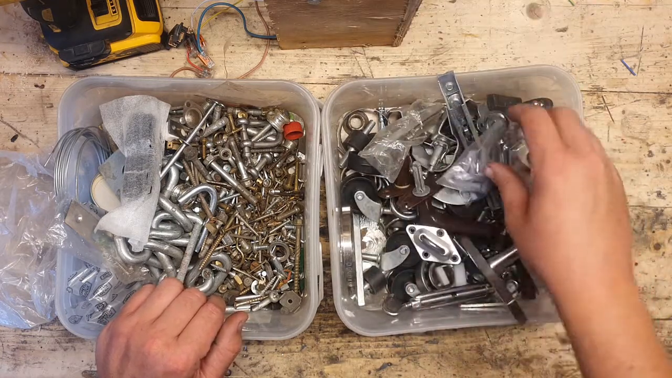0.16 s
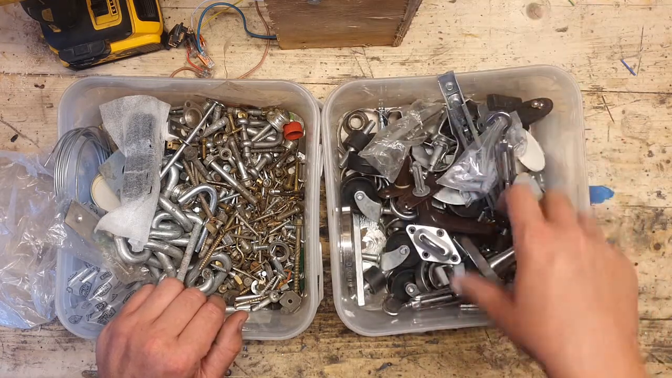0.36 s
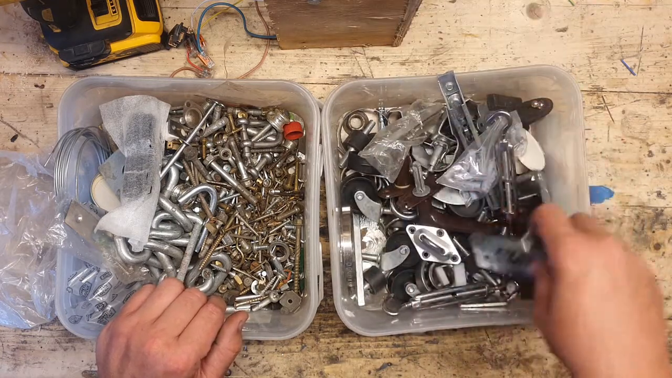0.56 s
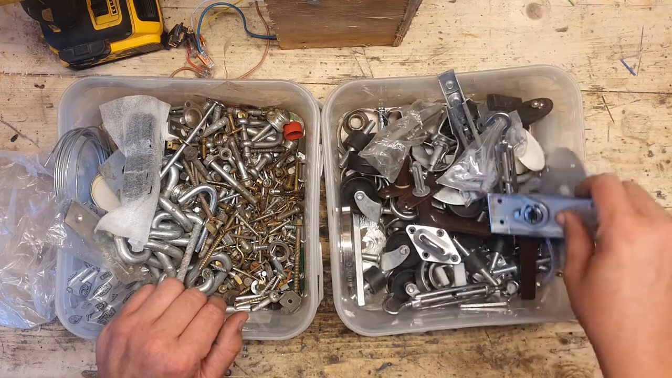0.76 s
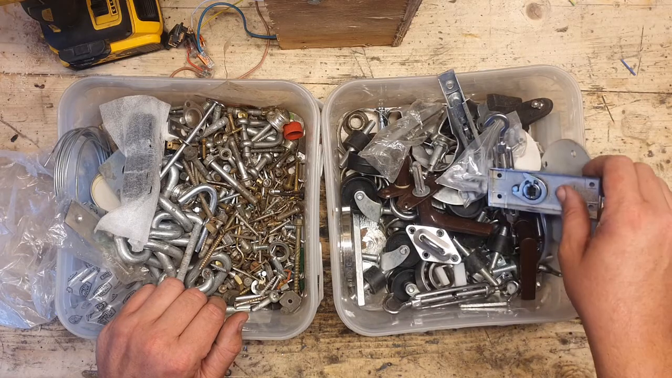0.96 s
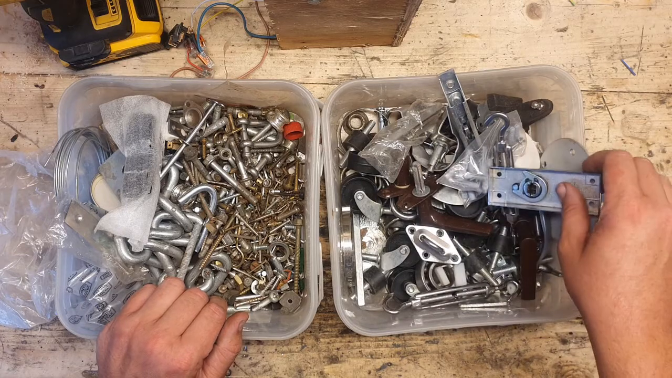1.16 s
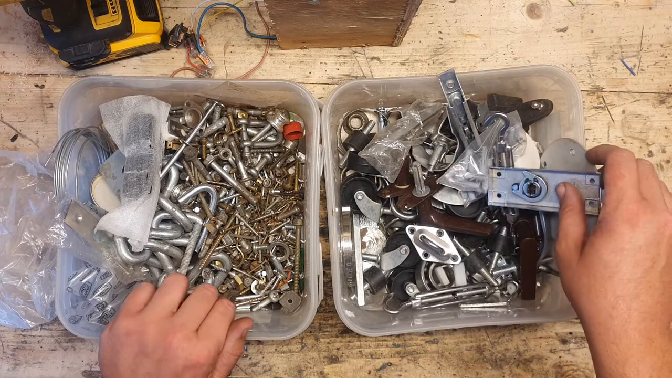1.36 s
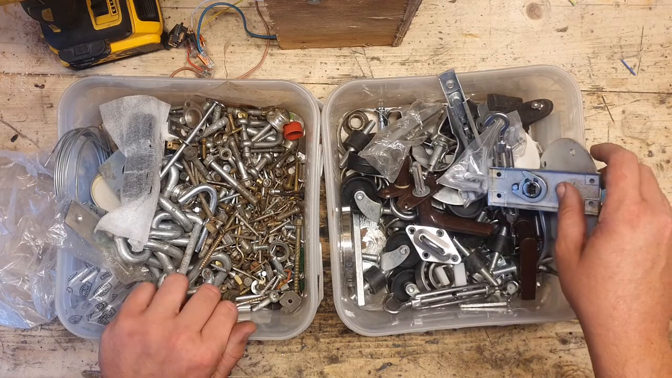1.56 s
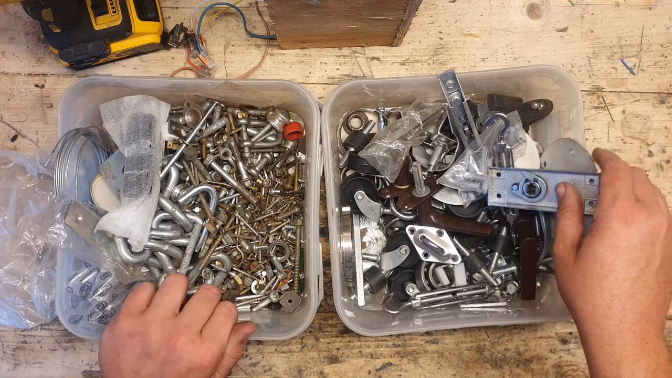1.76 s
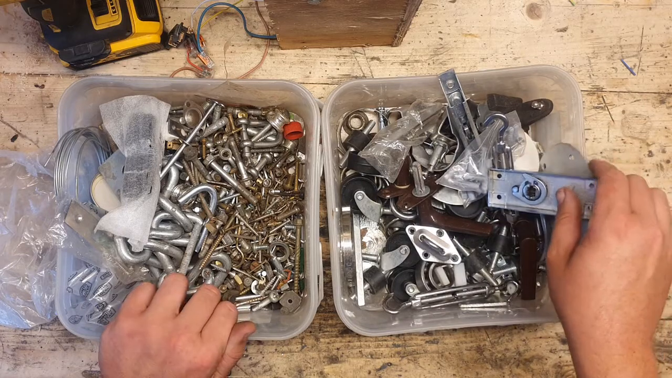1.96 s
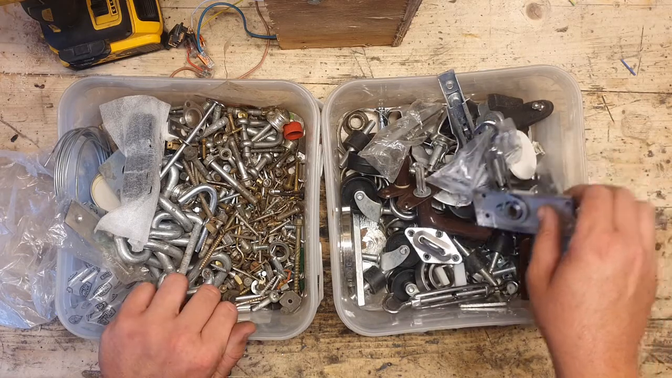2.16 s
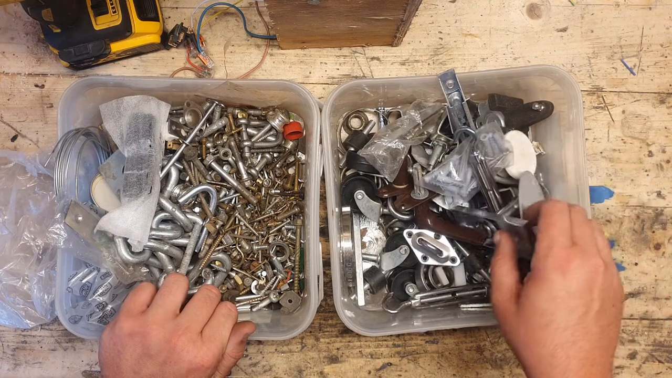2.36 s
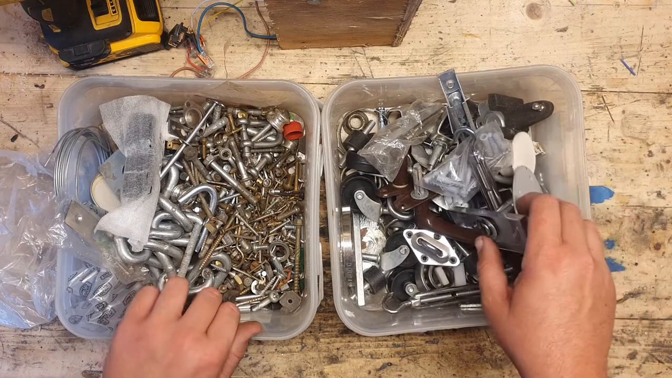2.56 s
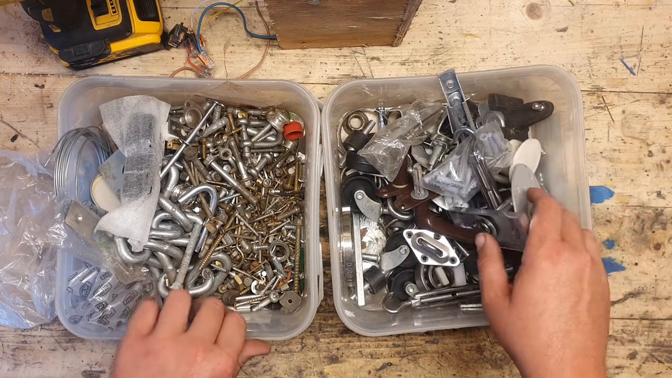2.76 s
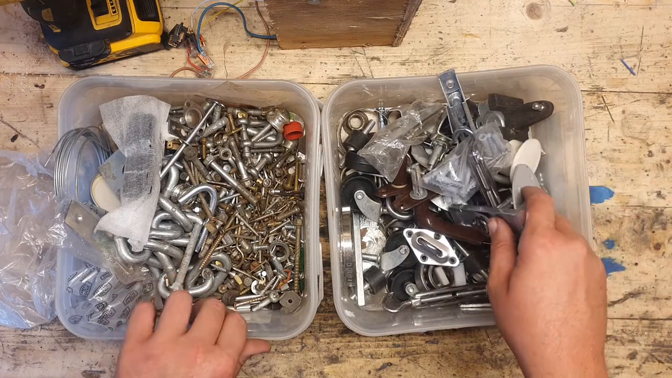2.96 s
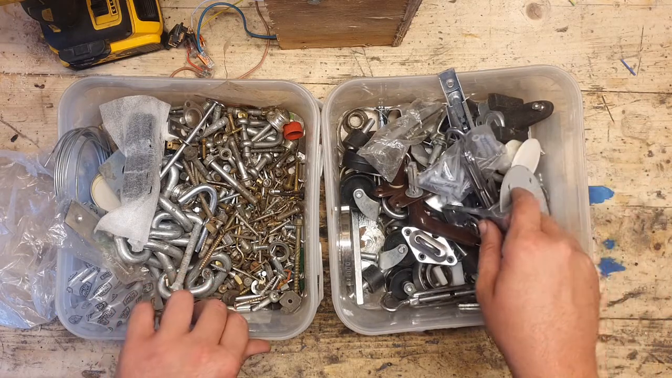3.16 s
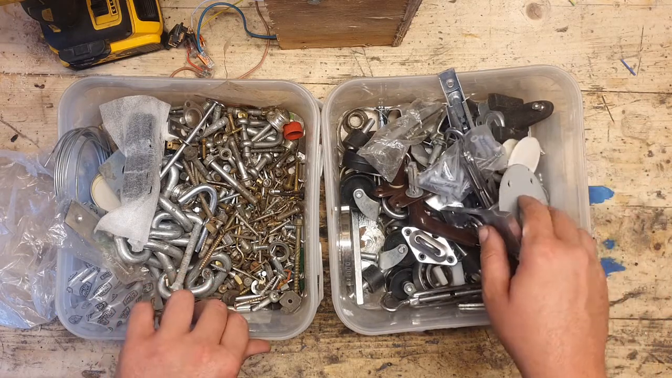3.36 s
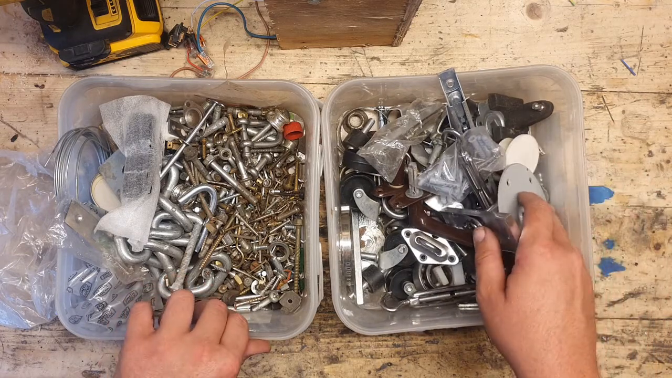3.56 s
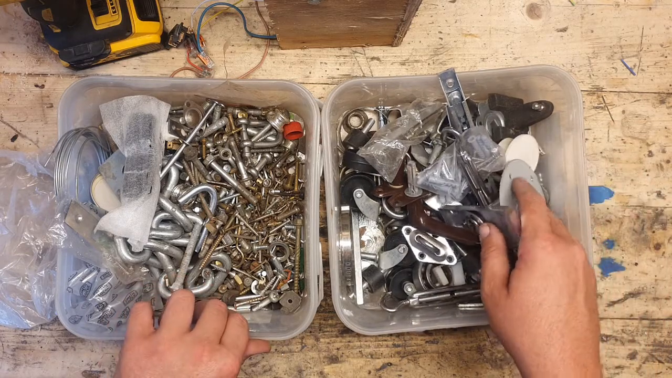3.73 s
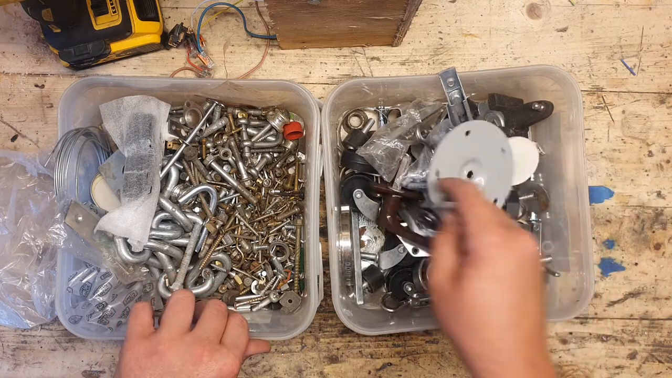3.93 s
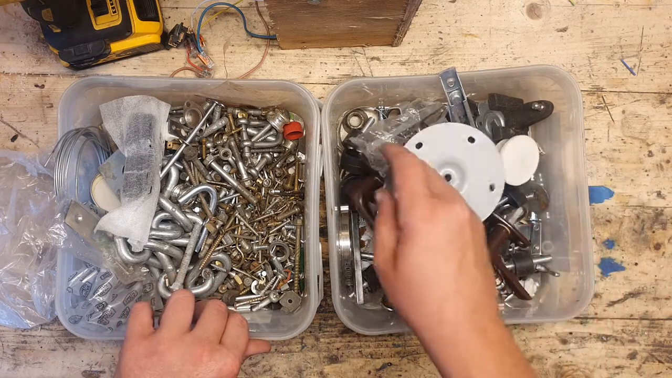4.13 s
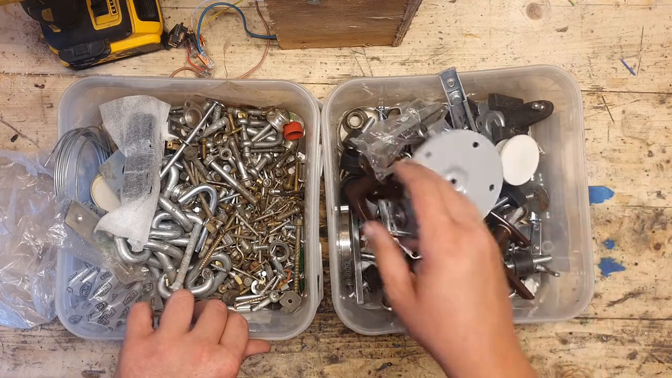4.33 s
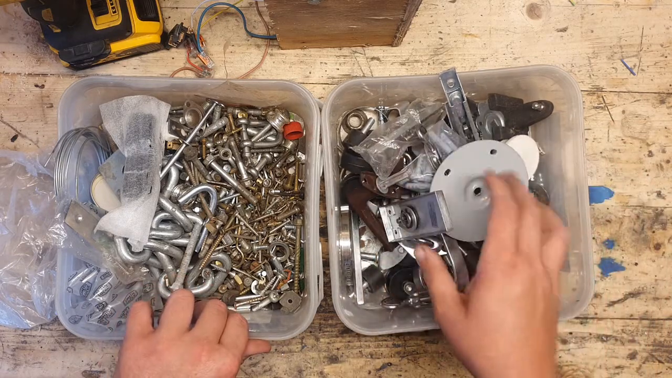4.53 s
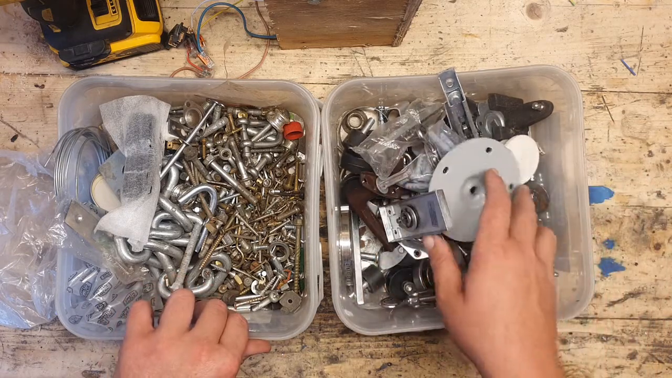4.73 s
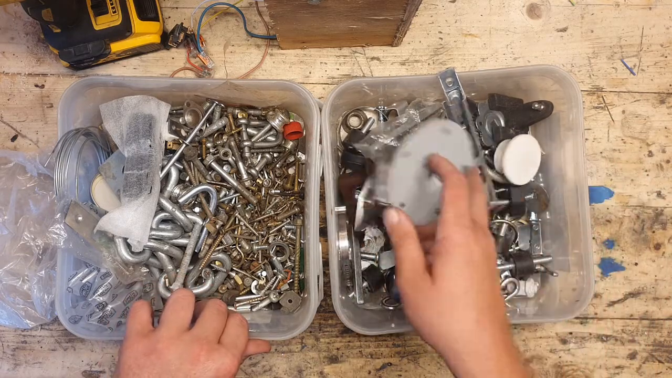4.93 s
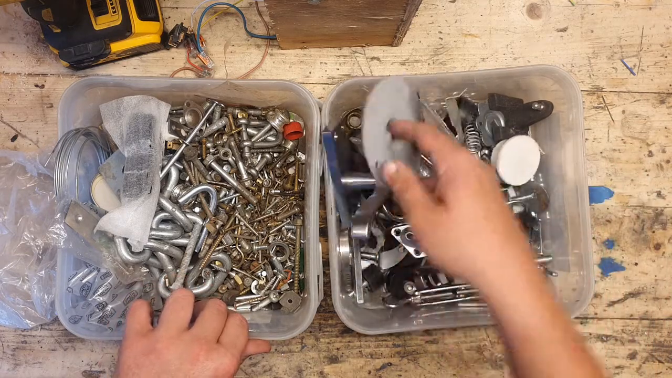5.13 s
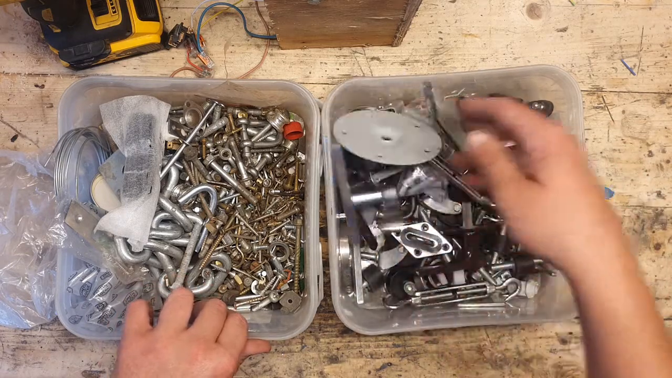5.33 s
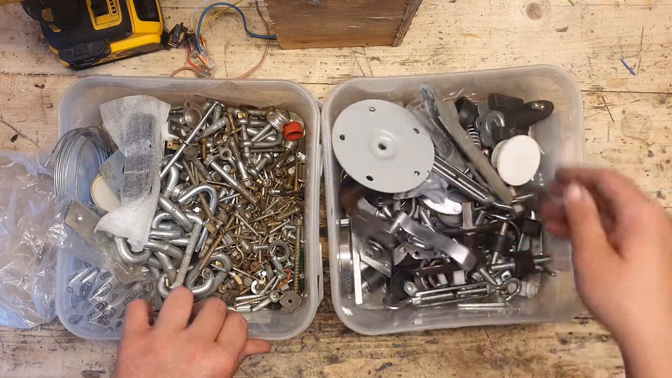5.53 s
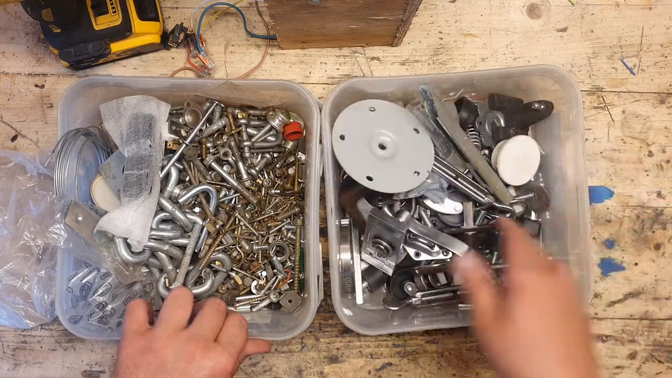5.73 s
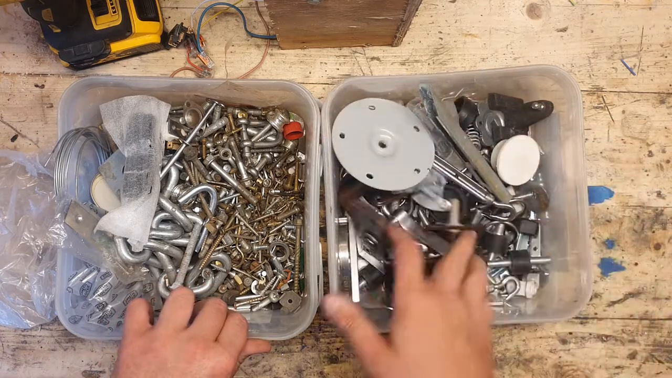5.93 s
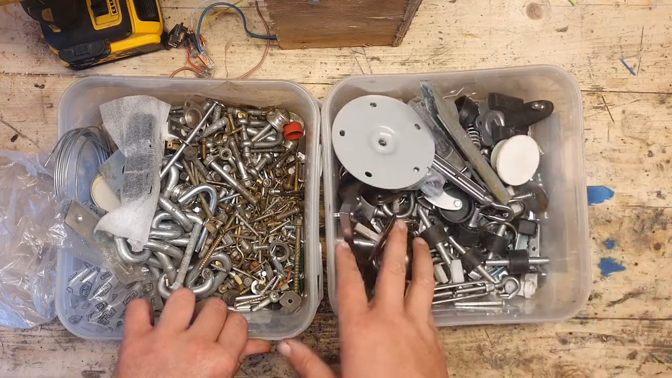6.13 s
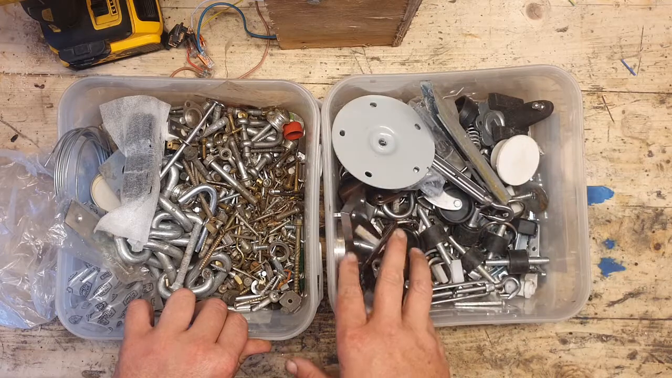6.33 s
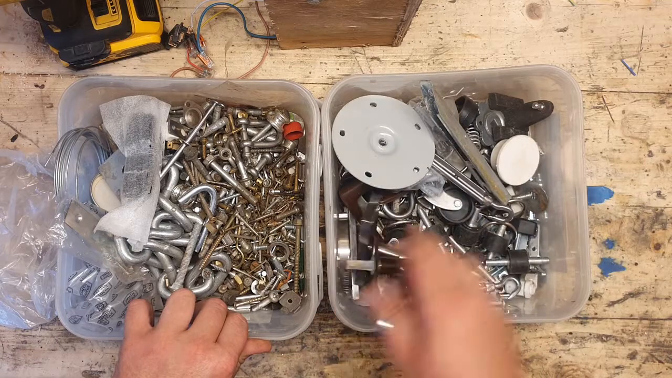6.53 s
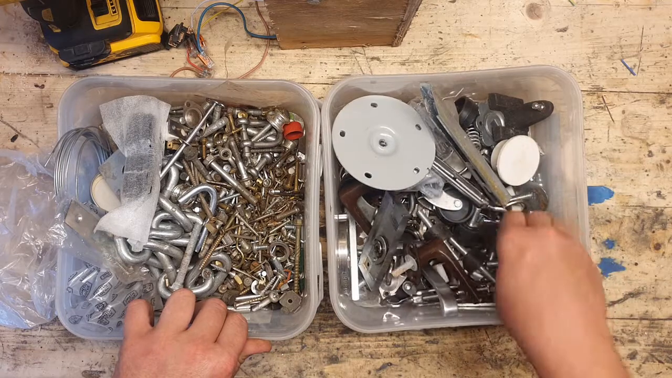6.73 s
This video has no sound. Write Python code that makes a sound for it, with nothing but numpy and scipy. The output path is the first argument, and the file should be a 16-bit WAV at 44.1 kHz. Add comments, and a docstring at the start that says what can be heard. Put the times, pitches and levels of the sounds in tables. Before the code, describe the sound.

A hand rummages in a plastic tub of loose metal fittings, clinking and rattling in bursts, with a ringing steel disc and hollow thuds.

```python
"""Rummaging in a tub of hardware

A hand rummages in a plastic tub of bolts, brackets and fittings on a workbench, just below the microphone.
Pieces knock and bounce as short clusters of modes and noise; pushes of the fingers set off random tiny contacts.
The tub thuds in its wall modes and groans under load; a steel disc and a small bracket ring until stopped.
The bench booms low, a small workshop adds short noise echoes, and a wavering rumble lies under faint hiss."""
import sys
import numpy as np
from scipy import signal
from scipy.fft import rfft, irfft
from scipy.io import wavfile
from scipy.ndimage import uniform_filter1d

SR = 44100
rng = np.random.default_rng(int(sys.argv[2]) if len(sys.argv) > 2 else 0)


def generate_wav(sig):
    """Save sig (samples, or channels by samples) to the path in sys.argv[1] as 16-bit PCM at SR."""
    pcm = np.round(np.clip(np.atleast_2d(sig).T, -1, 1) * 32767).astype(np.int16)
    wavfile.write(sys.argv[1], SR, pcm)


N = 299518
T = np.arange(N) / SR
SHORT = T[:SR // 6]

# blows on the steel disc: start_s, ring_db, treble tilt_db_per_octave, free_s until hand or heap stops it, clack_db
DISC_HITS = [(.023, -15, -2, 0.019, -9.5), (0.2008, -17.5, -2.5, 0.096, -11),
             (.571, -25.5, -8, 0.011, -17.5), (0.826, -42, -6, .09, -25), (3.924, -10, 1.5, 0.03, -17),
             (3.981, -22.5, 1.5, 0.03, -12.5), (4.241, -33, 1, 0.019, -24), (4.397, -20, 1.5, 0.03, -19),
             (4.435, -21, .5, 0.076, -26.5), (4.489, -16, -2.5, 0.21, -19.5),
             (4.742, -35, -3.5, 0.15, -21.5), (4.822, -20, 0.5, 0.039, -12.5),
             (4.983, -16.5, 3.5, 0.0056, -15), (5.242, -18.5, 3.5, 0.14, -20),
             (5.288, -17, -1.5, 0.055, -27.5)]
# blows on the bracket: start_s, ring_db, treble tilt_db_per_octave, free_s until it is stopped, clack_db
BRACKET_HITS = [(4.031, -25.5, -6, .12, -21.5), (5.543, -24, 3, 0.095, -7.5), (5.58, -21.5, 5, 0.022, -19),
                (6.257, -26, 0.5, 0.04, -20.5)]
# colour of the loose metal: frequency_hz, gain_db
METAL_COLOUR = [(300, -22.5), (700, 2.5), (950, -11), (1250, 2.5), (1900, 1.5), (2500, 4), (3300, 1),
                (5000, -2.5), (6500, -1), (8200, -8.5), (9300, -17), (11800, -7), (16000, -24.5)]


def undb(db):
    """Decibels to gain."""
    return 10 ** (np.asarray(db) / 20)


def fade(t, t60):
    """Free decay, 60 dB down after t60 seconds."""
    return np.exp(-np.log(1000) * t / t60)


def unit(x, count=220):
    """Scale a sound to rms 1 over its first samples."""
    return x / np.sqrt(np.mean(x[..., :count] ** 2))


def crest(x, size=130):
    """Scale a blow to rms 1 at its loudest moment."""
    power = uniform_filter1d(np.mean(x ** 2, axis=0), size)
    return x / np.sqrt(power.max())


def steady(x, size=4000):
    """Scale to a running rms of 1."""
    power = np.abs(uniform_filter1d(np.mean(x ** 2, axis=0), size))
    return x / np.sqrt(power + 1e-9)


def add(out, s, x):
    """Mix x into out from time s on."""
    i = max(int(s * SR), 0)
    out[..., i:i + x.shape[-1]] += x[..., :max(N - i, 0)]


def convolve(x, response):
    """Pass x through a response, keeping its length."""
    return signal.fftconvolve(np.atleast_2d(x), np.atleast_2d(response), axes=-1)[:, :x.shape[-1]]


def colour(x, points, size=2048):
    """Minimum-phase filter through (Hz, dB) points, joined on a log frequency axis."""
    hz, db = np.transpose(points)
    bins = np.maximum(np.fft.rfftfreq(size, 1 / SR), 1)
    gain = undb(np.interp(np.log(bins), np.log(hz), db))
    # folding the cepstrum forward makes the filter causal
    cepstrum = irfft(np.log(gain))
    cepstrum[1:size // 2] *= 2
    cepstrum[size // 2 + 1:] = 0
    return convolve(x, irfft(np.exp(rfft(cepstrum))))


def cut(x, hz, kind, order=4):
    """Low-pass or high-pass."""
    return signal.sosfilt(signal.butter(order, hz, kind, fs=SR, output="sos"), x)


def noise(length, width):
    """Stereo noise; width is side over mid."""
    mid, side = rng.standard_normal((2, length))
    return mid + width * side * np.array([[1], [-1]])


def ring(t, hz, gain, t60, spread):
    """Decaying modes, each with its own phase difference between left and right (spread, radians)."""
    waves = np.exp(np.outer(2j * np.pi * hz - np.log(1000) / t60, t))
    skew = spread * rng.uniform(-1, 1, len(hz)) * np.array([[.5], [-.5]])
    weights = gain * rng.choice([-1, 1], len(hz)) * np.exp(1j * skew)
    return np.einsum("cm,mt->ct", weights, waves).imag


def settle(x, span_s, count=9):
    """A piece lands on the uneven heap: it grazes, hits, and chatters out within span_s."""
    when = (np.arange(count) + rng.uniform(0, 1, count)) / count
    size = (when + .04) * np.exp(-when / .25) * rng.uniform(.5, 1, count)
    train = np.zeros(x.shape[-1])
    places = ((when - when[0]) * span_s * SR).astype(int)
    np.add.at(train, places, size * rng.choice([-1, 1], count))
    return convolve(x, train)


def knocks():
    """Each knock: a clack with its sparkle, the note of the struck piece, and a thud of the tub."""
    # piece against piece: start_s, clack_db, tub thud_db, sparkle_db, pitch_hz of the piece
    hits = [(0.0732, -22, -41, -24.5, 4200), (.299, -37.5, -64, -65, 2900), (.376, -45.5, -62, -87, 2970),
            (0.422, -44.5, -58, -64, 2130), (0.4875, -35, -49, -85, 4040), (.556, -27, -67, -57, 2100),
            (.618, -31.5, -34, -70, 2430), (.699, -23, -41, -47, 1506), (.893, -18, -32, -70, 2484),
            (.938, -25, -38.5, -70, 2480), (1.0325, -34.5, -53, -48.5, 4140),
            (1.1777, -34.5, -56.5, -85, 1245), (1.333, -49.5, -51, -88, 1730), (2, -39, -56, -70, 2200),
            (2.036, -26.5, -41.5, -83, 2000), (2.130, -24, -63, -56, 2810),
            (2.2696, -22.5, -44.5, -60, 2120), (2.3138, -22, -50, -36, 3700),
            (2.434, -20.5, -39, -46, 1270), (2.487, -38.5, -40.5, -73, 1150),
            (2.5674, -41.5, -47.5, -88, 2520), (2.7545, -34.5, -30.5, -59, 1230),
            (2.9872, -44, -68, -66, 1330), (3.097, -29, -58, -82, 1970), (3.165, -28, -67, -62, 2880),
            (3.3066, -40.5, -44.5, -65, 1550), (3.438, -30.5, -56, -44.5, 4610),
            (3.499, -39, -50.5, -90, 1190), (3.736, -34.5, -52, -88, 2540), (3.764, -28, -62, -66, 3240),
            (3.856, -21, -46, -37, 1290), (3.9653, -18, -27, -21.5, 2300), (4.127, -21, -29, -35, 1270),
            (4.364, -32, -48, -69, 2080), (4.6802, -29.5, -58, -63, 3990), (4.883, -17.5, -43, -28.5, 2110),
            (5.048, -13.5, -18.5, -32, 1730), (5.0951, -17, -26, -23.5, 1190),
            (5.2841, -14, -14.5, -32, 3980), (5.3944, -20.5, -22.5, -27, 5450),
            (5.616, -21, -37, -22, 5900), (5.791, -27, -65, -58, 1900), (5.876, -22.5, -54, -35.5, 1680),
            (5.920, -18, -37, -32.5, 2780), (6.0293, -18, -30.5, -28.5, 5970),
            (6.070, -7.5, -19, -23, 2960), (6.1028, -12.5, -15.5, -53, 2940),
            (6.199, -29.5, -48, -37, 2730), (6.276, -19, -61, -59, 2900), (6.3673, -30, -49, -62, 2870),
            (6.459, -16.5, -27, -28.5, 3290), (6.4711, -26, -20, -38, 2190),
            (6.5655, -25.5, -40, -66, 1370), (6.7076, -21, -45, -40, 5460), (6.7324, -17, -39, -62, 2510),
            (6.7824, -12.5, -28.5, -30, 3080)]
    hits = hits + landings(DISC_HITS, note_hz=2250) + landings(BRACKET_HITS, note_hz=2556)
    out = np.zeros((2, N))
    for s, clack_db, thud_db, sparkle_db, hz in hits:
        # a heavier blow spreads its cluster of contacts over a longer time
        span_s = np.interp(clack_db, [-30, -10], [.005, .016])
        metal = settle(piece(SHORT, ring_t60=.04, crack_db=1, buzz_db=-5.5), span_s)
        metal = colour(metal, METAL_COLOUR)
        note = ring(SHORT, hz * np.array([1, 1.06]), np.array([1, .6]), np.array([.04, .03]), spread=1.6)
        note = settle(note, span_s)
        body = crest(cut(metal, 7500, "low"))
        sparkle = crest(cut(metal, 7500, "high"))
        clack = undb(-5.5) * body + undb(-9.5) * crest(note)
        add(out, s, undb(clack_db) * clack)
        add(out, s, undb(sparkle_db) * sparkle)
        add(out, s, undb(thud_db) * crest(thud()))
    return out


def landings(blows, note_hz):
    """A plate that lands also knocks on the heap; thud and sparkle follow the clack."""
    thud_db, sparkle_db = -23.5, -17  # against the clack
    sparkle_octaves = 2.1  # span over which the treble tilt lifts the sparkle
    return [(s, clack_db, clack_db + thud_db, clack_db + sparkle_db + sparkle_octaves * tilt_db, note_hz)
            for s, _, tilt_db, _, clack_db in blows]


def piece(t, ring_t60, crack_db, buzz_db, count=14):
    """One bolt or washer: a sharp crack, its own short modes, and the buzz of its neighbours."""
    # modes lie closer together towards the bottom
    hz = 1000 + 14000 * ((np.arange(count) + rng.uniform(0, 1, count)) / count) ** 1.7
    t60 = np.minimum(ring_t60 * np.exp(.5 * rng.standard_normal(count)), .07)
    modes = ring(t, hz, rng.uniform(.3, 1, count), t60, spread=2.4)
    crack = noise(len(t), width=.75) * fade(t, t60=.016)
    buzz = noise(len(t), width=.8) * fade(t, t60=.085)
    return unit(modes) + undb(crack_db) * unit(crack) + undb(buzz_db) * unit(buzz)


def thud():
    """The tub wall answers a blow in its modes, their strengths and pitches varied, with a noisy slap."""
    # plastic tub under its load, before variation and damping: frequency_hz, level_db, t60_s
    tub_modes = [(170, -14, .09), (265, -11, .07), (322, 0, .11), (385, -7, .06), (487, 0, .15),
                 (598, -2, .12), (675, -5, .08), (768, -2, .12)]
    hz, db, t60 = np.transpose(tub_modes)
    pitch_chance, level_chance = rng.standard_normal((2, len(hz)))
    gain = undb(db + 3.5 * level_chance)
    modes = ring(SHORT, hz * (1 + .012 * pitch_chance), gain, .85 * t60, spread=.4)
    slap = noise(len(SHORT), width=0.61) * fade(SHORT, t60=0.12)
    slap = cut(cut(slap, 870, "low"), 550, "high", order=2)
    return unit(unit(modes) + undb(1.0) * unit(slap))


def heap(count=160):
    """The fingers push the heap: many pieces tick and scrape against each other and against the tub."""
    metal_db, tub_db = pushes()
    # a firm push lets every contact sound; gentler ones fewer, down to the sparse share
    firm_db, busy_slope, sparse_share = -26.5, 0.57, 0.49
    moving = np.clip(undb(busy_slope * (metal_db - firm_db)), sparse_share, 1)
    pieces = [piece(T[:SR // 14], ring_t60=.04, crack_db=1, buzz_db=-9, count=10) for _ in range(count)]
    metal = colour(contacts(pieces, moving, count=3400, scatter_db=2.5), METAL_COLOUR)
    thuds = [thud() for _ in range(count // 6)]
    tub = contacts(thuds, np.sqrt(moving), count=800, scatter_db=3.0)
    # a gentle push makes duller contacts
    hardness = undb(np.clip(.5 * (metal_db + 29), -14, 1))
    dull = cut(metal, 3900, "low", order=2)
    metal = dull + hardness * (metal - dull)
    # the pieces jam and give way in short lurches
    lurch_db = 2.5 * np.interp(T, np.linspace(0, T[-1], num=300), rng.standard_normal(size=300))
    metal = metal * undb(lurch_db)
    return undb(metal_db) * steady(metal, size=2600) + undb(tub_db) * steady(tub, size=2600)


def pushes():
    """Levels of metal and tub in dB: each push builds up, holds and dies away."""
    # the fingers push the heap: start_s, held_s, metal_db, tub_db
    shoves = [(0, 0.048, -25.5, -35.5), (0.531, 0.5, -47.5, -50), (1.56, .11, -68.5, -68.5),
              (2.03, 0.1, -47.5, -55), (2.198, 0.16, -38, -50), (2.419, 0.03, -39, -46),
              (2.728, 0.06, -52, -53), (3.06, 0.087, -47, -53), (3.89, 0.072, -25, -39),
              (4.039, 0.11, -33, -50), (4.412, 0.1, -30.5, -45.5), (4.792, 0.061, -35, -47.5),
              (4.9, 0.28, -27, -36.5), (5.318, 0.27, -29.5, -37), (5.938, 0.19, -28, -33),
              (6.43, 0.2, -46.5, -48.5), (6.718, 0.082, -30.5, -40.5)]
    grip_db_per_s, rest_db_per_s = 223, 279.5  # build-up of a push, and the heap coming to rest
    t = np.linspace(0, T[-1], num=3000)
    start, held, metal_db, tub_db = np.transpose(shoves)[:, :, None]
    build_db = -grip_db_per_s * np.maximum(start - t, 0)
    rest_db = -rest_db_per_s * np.maximum(t - start - held, 0)
    # the strongest push wins at each moment
    return [np.interp(T, t, np.max(db + build_db + rest_db, axis=0)) for db in (metal_db, tub_db)]


def contacts(sounds, share, count, scatter_db):
    """Random tiny contacts, most weak and a few strong; share is the fraction that sounds at each moment."""
    out = np.zeros((2, N))
    for when, which, strength, moves in rng.random((count, 4)):
        if moves < share[int(when * N)]:
            level_db = scatter_db * min(-np.log(strength), 4)
            add(out, when * T[-1], undb(level_db) * sounds[int(which * len(sounds))])
    return out


def disc():
    """The steel disc rings in its modes, almost the same pitches at every blow."""
    # steel disc, t60 before damping on the heap: frequency_hz, level_db, t60_s
    disc_modes = [(2215, -5, .16), (2262, -2, .16), (2540, -15, .2), (3060, -19, .17), (4136, 0, .46),
                  (4330, -8, .25), (6570, -8, .3), (6655, -11, .2), (8085, -14, .25), (9260, -16, .2),
                  (10005, -16, .2), (11355, -13, .3), (12285, -11, .27), (12440, -16, .22),
                  (14740, -27, .25), (15720, -29, .2)]
    return plate(disc_modes, DISC_HITS, detune=0.00056, grip_t60=0.083)


def bracket():
    """The small bracket rings in fewer, shorter modes that vary more in pitch."""
    # bracket, t60 before damping on the heap: frequency_hz, level_db, t60_s
    bracket_modes = [(2799, -10, .1), (5350, -4, .18), (6508, 0, .18), (7150, -15, .25), (8665, -12, .14),
                     (11252, -5, .18), (11695, -13, .2)]
    return plate(bracket_modes, BRACKET_HITS, detune=0.003, grip_t60=0.083)


def plate(modes, blows, detune, grip_t60):
    """A metal plate chatters as it lands, then rings until something touches it; tilt sets its treble."""
    out, t = np.zeros((2, N)), T[:SR // 2]
    hz, db, t60 = np.transpose(modes)
    # lying on the heap, its high modes die sooner
    t60 = t60 * (hz[0] / hz) ** .12
    for s, blow_db, tilt_db, free_s, _ in blows:
        level_chance, pitch_chance = rng.standard_normal((2, len(hz)))
        gain = undb(db + tilt_db * np.log2(hz / hz[0]) + level_chance)
        tone = ring(t, hz * (1 + detune * pitch_chance), gain, t60, spread=1.5)
        # while it chatters the ring builds up and its lines are rough
        chatter = settle(tone * fade(t, t60=.08), span_s=.025)
        swell = 1 - np.exp(-t / .003)
        sound = swell * crest(tone) + undb(-3) * crest(chatter)
        grip = fade(np.maximum(t - free_s, 0), grip_t60)
        add(out, s, undb(blow_db) * sound * grip)
    return out


def groans():
    """The loaded tub wall flexes: a rough low note that sinks as it fades."""
    # the wall gives under a heavy load: start_s, level_db
    flexes = [(5.09, -44), (5.291, -39), (6.084, -34), (6.476, -41)]
    start_hz, sag_octaves_per_s = 180, 6.8
    attack_s, decay_t60_s = .015, 0.4
    roughness = 0.77  # radians of phase, and share of level
    out, t = np.zeros((2, N)), T[:SR // 3]
    phase = 2 * np.pi * np.cumsum(start_hz * 2 ** (-sag_octaves_per_s * t)) / SR
    shape = (1 - np.exp(-t / attack_s)) * fade(t, decay_t60_s)
    for s, db in flexes:
        judder = np.interp(t, np.linspace(0, t[-1], num=30), rng.standard_normal(size=30))
        judder = judder * roughness
        add(out, s, undb(db) * shape * np.sin(phase + judder) * (1 + judder))
    return out


def bench(blows):
    """The bench top takes the weight of the hand and booms low: noise shaped by the force drives its modes."""
    hz, gain = np.array([45., 56., 70., 155.]), np.array([.3, 1, .6, .3])
    boom = ring(T[:SR // 2], hz, gain, t60=np.array([.3, .4, .25, .09]), spread=.5)
    low_blows = cut(blows.mean(axis=0), 880, "low")
    force = np.sqrt(np.abs(uniform_filter1d(low_blows ** 2, size=900)))
    return undb(-6.5) * convolve(force * rng.standard_normal(N), boom / np.sqrt(np.sum(boom[0] ** 2)))


def workshop(x, t60_low, t60_high, wet_db):
    """Dense short noise echoes from bench and walls, with separate decays below and above 2200 Hz."""
    t = T[:SR // 2]
    echoes = rng.standard_normal((2, len(t))) * np.clip(t / 0.021, 0, 1)
    low = cut(echoes, 2200, "low", order=1)
    tail = low * fade(t, t60_low) + (echoes - low) * fade(t, t60_high)
    return x + undb(wet_db) * convolve(x, tail / np.sqrt(np.sum(tail[0] ** 2)))


def background():
    """A wavering low rumble, much alike in left and right, under faint hiss."""
    # relative spectrum of the background, with a deep notch near 9 kHz: frequency_hz, density_db (per Hz)
    rumble_and_hiss = [(15, -26), (25, -9.5), (66, 3), (200, -37.5), (335, -24.5), (463, -12), (887, -23),
                       (1520, -17.5), (3160, -26.5), (5880, -20.5), (7510, -28.5), (9070, -70.5),
                       (11600, -50), (16000, -54)]
    bed = colour(noise(N, width=.25), rumble_and_hiss, size=8192)
    waver = np.interp(T, np.linspace(0, T[-1], num=50), rng.standard_normal(size=50))
    level_db = -65 + 1.6 * waver
    return unit(bed, count=N) * undb(level_db)


def scene():
    """All the hardware in the tub, on its bench, in the room."""
    blows, shifting = knocks(), heap()
    rings = disc() + bracket()
    room = workshop(blows + shifting + rings, t60_low=0.11, t60_high=0.18, wet_db=-7)
    return room + groans() + bench(shifting + 0.18 * blows) + background()


def record(dry):
    """Left and right differ in level from band to band; peaks are clipped and the top is cut."""
    # level difference between the left and right channels: frequency_hz, left minus right lean_db
    channel_lean = [(100, 1), (500, -2), (2400, -1.5), (4200, -7), (6400, -7), (7200, -.5), (9300, 0),
                    (11300, -8), (13200, 0)]
    hz, lean_db = np.transpose(channel_lean)
    # each channel takes half of the difference
    channels = [colour(x, np.column_stack([hz, side * lean_db])) for x, side in zip(dry, (.5, -.5))]
    clipped = np.clip(np.vstack(channels), -.88, .88)
    top_cut = signal.ellip(10, .2, 80, 15900, fs=SR, output="sos")  # low-pass at 15900 Hz
    return signal.sosfilt(top_cut, clipped)


dry = scene()
out = record(dry)
generate_wav(out)
```